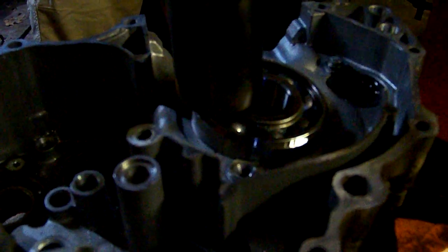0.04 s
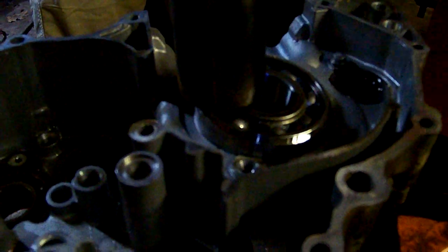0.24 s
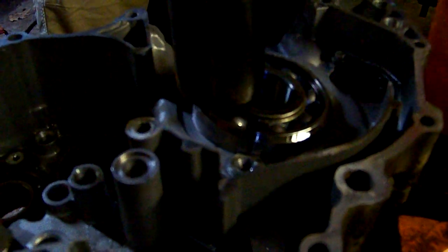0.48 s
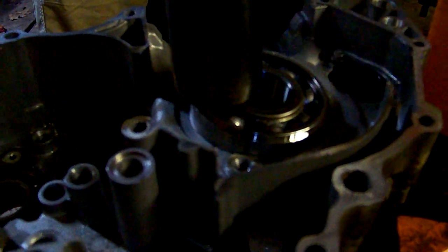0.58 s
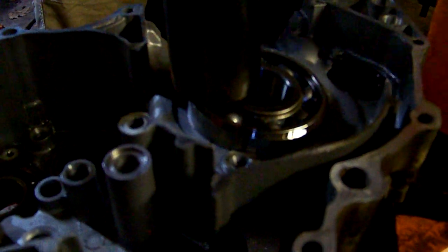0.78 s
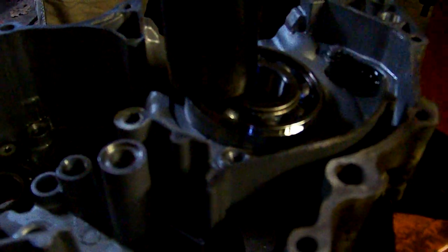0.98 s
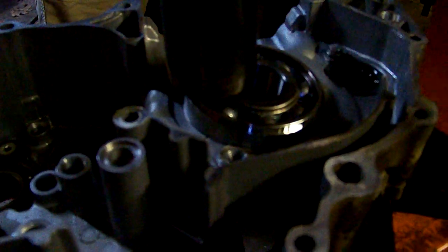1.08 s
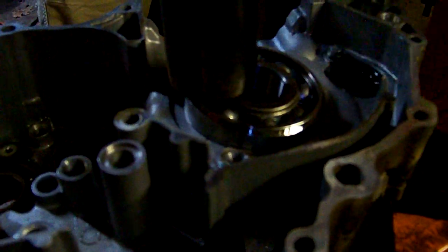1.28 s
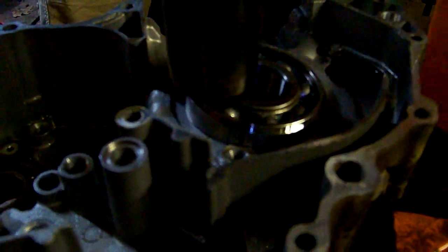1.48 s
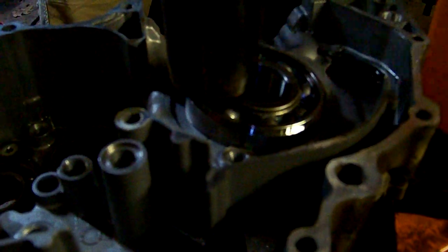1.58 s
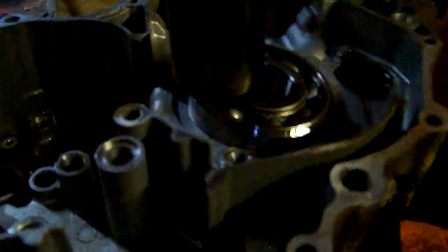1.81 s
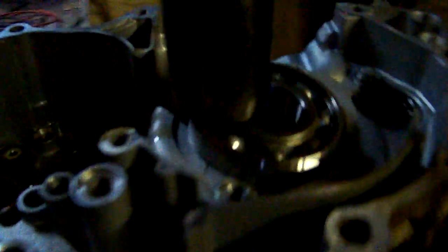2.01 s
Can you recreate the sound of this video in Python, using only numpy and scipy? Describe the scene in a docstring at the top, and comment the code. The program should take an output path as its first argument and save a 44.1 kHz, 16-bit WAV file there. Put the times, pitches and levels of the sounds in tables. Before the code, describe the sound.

A jack-driven press gives sharp, uneven steel clicks, then clunks at about 0.2 seconds, leaving an engine casing ringing and loose parts chattering lightly. The handle knocks near 0.75 seconds, followed by short pivot scrapes and a sharp click. More clicks lead to a second ringing clunk at 1.25 seconds. Another knock, scrape and fading clicks follow from 1.7 seconds. Faint hiss and low rumble fill the small workshop.

```python
"""A jack-driven shop press pushes a bearing into an engine casing in a small workshop.
Twice the steel linkage clicks and the loaded frame clunks, setting the casing ringing; between strokes
the handle knocks at the end of its travel, its pivot scrapes and loose parts chatter. Each impact is
a brief broadband contact followed by the free decay of the struck body's modes. The walls add
reverberation, and hiss, a low rumble and a drone lie underneath."""
import sys
import numpy as np
from scipy import signal
from scipy.fft import rfft, irfft
from scipy.io import wavfile
from scipy.ndimage import uniform_filter1d

SR = 44100
rng = np.random.default_rng(int(sys.argv[2]) if len(sys.argv) > 2 else 0)


def unload_wav(signal):
    """Save mono or channel-first audio to the path in sys.argv[1] as 16-bit WAV at rate SR, clipped to [-1, 1]."""
    wavfile.write(
        sys.argv[1],
        SR,
        np.round(np.clip(np.atleast_2d(signal).T, -1, 1) * 32767).astype(np.int16),
    )


N = 90404
T = np.arange(int(.8 * SR)) / SR  # time axis of one event, in seconds

# Envelopes of the two low tones. Each row: time in seconds, relative level in dB.
RUMBLE_LEVELS = [(0.0, -46.5), (0.19, -51), (0.22, -52), (0.32, -48.5), (0.36, -52), (0.5, -41.5),
                 (0.71, -56.5), (0.74, -44), (1.01, -53.5), (1.21, -43.5), (1.37, -50), (1.39, -59),
                 (1.66, -44), (1.76, -55), (1.78, -48), (2.05, -64)]
DRONE_LEVELS = [(0, -49.5), (.3, -49), (.65, -49), (.8, -41), (.95, -52), (1.15, -56.5), (1.3, -53),
                (1.45, -79), (1.63, -65), (1.72, -39.5), (1.88, -45), (2.05, -66)]
# Spectra of the hiss and the wall reflections. Each row: frequency in Hz, relative level in dB.
HISS_SPECTRUM = [(20, -2.5), (70, -2.5), (110, -3.5), (240, -6), (305, -15.5), (380, -11.5), (520, -2.5),
                 (640, -8), (850, -7), (1100, -11), (1500, -8.5), (2000, -16), (4000, -19.5), (7000, -22.5),
                 (8000, -40), (9500, -43.5)]
WALL_SPECTRUM = [(200, 1), (450, -1), (900, -1), (2000, 1), (3000, -6), (4200, 1), (6000, -2.5),
                 (9000, -7.5)]
# Reverberation of the workshop. Each row: frequency in Hz, time to decay by 60 dB (T60) in seconds.
ROOM_T60 = [(200, 0.49), (700, 0.21), (1700, 0.27), (3500, 0.19), (8000, 0.2)]
# Likeness of the noise in the two channels. Each row: frequency in Hz, correlation coefficient.
COHERENCE = [(100, 0.79), (800, 0.57), (2500, 0.25), (5000, 0.17), (9000, 0.13)]
# Response dips at the microphone's position. Each row: frequency in Hz, gain in dB.
POSITION_DIPS = [(270, -4), (305, -9), (345, -0.5), (915, -1), (965, -9.5), (1015, -0.5)]
# Imbalance of the microphone ports. Each row: frequency in Hz, left minus right in dB.
PORT_BALANCE = [(40, 10.5), (400, 11), (850, 10.5), (1450, 3.5), (2200, 4.5), (3100, 4.5), (4200, 0),
                (5600, 0), (6800, -2.5), (9000, -5)]

# Modes of the linkage. Each row: frequency in Hz, relative level in dB.
LINKAGE_MODES = [(1430, -5), (2140, -20), (2290, -5), (2790, -2), (2870, -13.5), (3040, 3), (3185, -2.5),
                 (3630, -1), (3720, -5.5), (3850, -0.5), (4900, -12.5), (5480, -15.5), (6520, -16.5)]
# Modes of the other bodies. Each row: frequency in Hz, relative level in dB, T60 in seconds.
HANDLE_MODES = [(413, 0, 0.1), (567, -5.5, 0.085), (746, 0, 0.026), (879, 2.5, 0.074), (940, 4, 0.074),
                (1040, -17, 0.13), (1504, -3.5, 0.12)]
FRAME_MODES = [(397.3, -11.5, 0.063), (690, -12.5, .05), (760, -2.5, 0.062), (878, 3.5, 0.064),
               (1016, -9, 0.11)]
CASING_MODES = [(527, -14.5, 1.3), (855, 1, .45), (867, -3.5, 0.1), (999, -3, 0.25), (1136, -0.5, .35),
                (1236, -5.5, .5), (1430, -29.5, .45), (1462, 3.5, 0.21), (1475, -4, 0.41),
                (1474, -2.5, 0.81), (1596, -3, 0.25), (1944, -25, .25), (2256, -21, .27), (2113, -3, .24),
                (2700, -12, 0.68)]
# Spectra of the dense, brief vibration at each contact. Each row: frequency in Hz, relative level in dB.
RATTLE_SPECTRUM = [(300, -33), (520, -10.5), (650, -8.5), (850, -1.5), (1200, -22), (1400, -3.5), (1530, 7),
                   (1700, -31.5), (2200, -14.5), (4000, -21), (9000, -47.5)]
KNOCK_SPECTRUM = [(100, -25.5), (300, -19.5), (380, -4.5), (700, -7.5), (930, 2), (1300, -10), (2500, -7.5),
                  (3200, -3), (3800, -16), (6500, -24), (9500, -48.5)]
SCRAPE_SPECTRUM = [(100, -21.5), (800, -1), (1100, -11), (1600, -1.5), (3000, 3.5), (4300, -6), (4900, -8),
                   (5700, -12), (6600, -5.5), (7300, -11), (7900, -19), (9400, -28)]
CLICK_SPECTRUM = [(100, -11.5), (500, -23.5), (1000, -14.5), (1900, -10), (3100, -4), (4400, -12),
                  (5500, -13), (7200, -28.5), (8000, -36.5), (9500, -45.5)]
CLACK_SPECTRUM = [(100, -31), (300, -18), (800, 5.5), (1000, 2.5), (1500, 12), (2150, 5), (2450, -16.5),
                  (3700, -1), (6000, -19), (9500, -49.5)]
THUMP_SPECTRUM = [(60, -7.5), (240, -15), (305, -25), (380, -2.5), (590, -16.5), (840, 20), (980, -17.5),
                  (1600, 0), (2600, -16), (8000, -46)]

# Loose parts chatter after each clunk. Each row: start in seconds, level in dB.
RATTLES = [(0.278, -47), (0.325, -38), (0.404, -42), (.447, -44), (0.482, -49), (.515, -52), (.621, -70.5),
           (1.296, -51.5), (1.336, -35.5), (1.405, -53), (1.464, -47.5), (1.49, -48), (1.52, -56)]
# The handle meets its stop. Each row: start in seconds, level in dB, tilt in dB per octave.
KNOCKS = [(0.7562, -29.5, 0), (0.765, -34.5, -1), (1.6885, -27, 1), (1.697, -30.5, -3), (1.859, -46.5, -13)]
# The pivot slips. Each row: start in seconds, length in seconds, level in dB, tilt in dB per octave.
SCRAPES = [(0.217, 0.018, -24, -4.5), (0.8157, 0.0074, -30, -0.5), (0.824, 0.0092, -27.5, 3),
           (.835, 0.0059, -26, 2), (0.8593, .011, -19.5, 3.5), (1.195, 0.04, -34, -4.5),
           (1.237, 0.024, -27.5, -4), (1.741, .004, -39.5, 1.5), (1.7477, 0.015, -23, 0.5),
           (1.972, 0.048, -42.5, 1.5)]
# The linkage snaps. Each row: start in seconds, level in dB, tilt in dB per octave,
# ping frequency in Hz, ping level relative to the snap in dB.
CLICKS = [(.0855, -49, 8.5, 4510, 0), (0.1466, -29.5, -1.5, 3074, -2), (0.1821, -38, 3, 2770, 1),
          (.197, -38, -5, 1480, -13.5), (.2108, -17.5, 2, 3210, -7.5), (.2275, -26, 1.5, 3770, -3),
          (.8718, -17, 2, 2850, -8), (.971, -46, 4.5, 1536, -3.5), (1.0205, -37, -4, 3150, -13),
          (1.0372, -25.5, 3, 3214, 1.5), (1.1695, -45, -1.5, 2300, -4), (1.1802, -34.5, -2.5, 2890, 3),
          (1.2097, -25.5, -2.5, 2710, -3), (1.231, -20.5, -0.5, 3124, -1), (1.239, -24.5, -4, 3260, -6.5),
          (1.7822, -33, -4.5, 3220, -15), (1.796, -25.5, -1, 2290, -20), (1.899, -45, 13.5, 6500, -13),
          (1.9378, -37.5, -1.5, 3050, -1), (1.9668, -41, 16, 3200, 5), (1.9735, -39, -6, 3170, -16)]
# The frame takes the load. Each row: start in seconds, clack level in dB, thump level in dB,
# delay from thump to rebound in seconds.
CLUNKS = [(0.2302, -17.5, -16, 0.0087), (1.2475, -17.5, -16.5, 0.00677)]


def amp(db):
    """Amplitude grows tenfold for every 20 dB."""
    return 10 ** (np.asarray(db) / 20)


def curve_at(points, hz):
    """Interpolation along a logarithmic frequency axis."""
    known_hz, values = np.transpose(points)
    return np.interp(np.log(hz + 1), np.log(known_hz + 1), values)


def add(mix, start, sound):
    """Superposition: a sound adds to the mix from its start in seconds."""
    part = mix[:, max(round(start * SR), 0):][:, :sound.shape[-1]]
    part += sound[..., :part.shape[1]]


def unit(x):
    """Energy normalisation: a hit gets the energy of 10 ms at full level."""
    return x / np.sqrt(np.mean(x ** 2) * x.shape[-1] / SR * 100 + 1e-20)


def noise(count):
    """Partial coherence: two channels of white noise are the sum and difference of mid and side."""
    mid, side = rfft(rng.standard_normal((2, count)))
    coherence = np.clip(curve_at(COHERENCE, np.fft.rfftfreq(count, 1 / SR)), -1, 1)
    mid, side = mid * np.sqrt((1 + coherence) / 2), side * np.sqrt((1 - coherence) / 2)
    return irfft([mid + side, mid - side], count)


def coloured(x, spectrum, tilt_db=0):
    """Minimum-phase filtering imposes a spectrum causally, with a tilt per octave above 500 Hz."""
    hz = abs(np.fft.fftfreq(4096, 1 / SR))
    octaves = np.log2(np.maximum(hz, 500) / 500)
    log_gain = np.log(amp(curve_at(spectrum, hz) + tilt_db * octaves))
    taps = np.fft.ifft(np.exp(np.conj(signal.hilbert(log_gain)))).real[:2048]
    return signal.fftconvolve(x, taps[None], axes=1)[:, :x.shape[1]]


def low_tone(levels, hz, wander, gain_db):
    """Slow random frequency modulation makes a low sinusoid waver."""
    t = np.arange(N) / SR
    drift = np.interp(t, np.linspace(0, t[-1], num=40), rng.standard_normal(40))
    phase = 2 * np.pi * np.cumsum(hz * (1 + wander * drift)) / SR
    return amp(np.interp(t, *np.transpose(levels)) + gain_db) * np.sin(phase)


def background(hiss_db=-49):
    """The noise floor: stationary hiss superposed on a low rumble and a drone."""
    hiss = coloured(noise(N), HISS_SPECTRUM)
    rumble = low_tone(RUMBLE_LEVELS, hz=40, wander=.08, gain_db=5.5)
    drone = low_tone(DRONE_LEVELS, hz=75.3, wander=0.098, gain_db=-3.5)
    return amp(hiss_db) * hiss / hiss.std() + rumble + drone


def room(x, wet_db, build_s=0.0069):
    """Reverberation: diffuse reflections build up after the direct sound; the bass lasts longest."""
    hz, t, bands = signal.stft(noise(len(T)), SR, nperseg=256)
    decay = amp(-60 * t / curve_at(ROOM_T60, hz)[:, None])
    tail = signal.istft(bands * decay, SR, nperseg=256)[1][:, :len(T)]
    build = 1 - np.exp(-(T / build_s) ** 2)
    spectrum = rfft(tail * build, 2 * len(T))
    power = abs(spectrum) ** 2
    # level out narrow peaks and troughs
    evenness = np.sqrt(uniform_filter1d(power, size=1500) / uniform_filter1d(power, size=60))
    tail = irfft(spectrum * evenness)[:, :len(T)] * np.sqrt(build)
    tail /= np.linalg.norm(tail, axis=1, keepdims=True)
    return x + amp(wet_db) * signal.fftconvolve(x, coloured(tail, WALL_SPECTRUM), axes=1)[:, :N]


def ring(modes, tilt_db=0):
    """Free vibration is a sum of damped modes; dividing by sqrt(T60) makes each level an energy share."""
    vibration = np.zeros(len(T))
    for k, (hz, db, t60) in enumerate(modes):
        envelope = amp(db + tilt_db * np.log2(hz) - 60 * T / t60) / np.sqrt(t60)
        vibration += (-1) ** k * envelope * np.sin(2 * np.pi * hz * T)
    return unit(vibration)


def linkage_ring(tilt_db=0, t60=0.035):
    """Equal damping: all modes of the steel linkage die together in a short clink."""
    return ring([(hz, db, t60) for hz, db in LINKAGE_MODES], tilt_db)


def contact(spectrum, hold_s, t60, tilt_db=0, snap=0):
    """Modal overlap: an impact's crowded modes act as decaying noise, led by an impulse of size snap."""
    out = np.zeros((2, len(T)))
    t = T[:len(T) // 4]
    envelope = amp(-60 * np.maximum(t - hold_s, 0) / t60)
    excitation = unit(noise(len(t)) * envelope) + snap * unit(1. * (t == 0))
    out[:, :len(t)] = unit(coloured(excitation, spectrum, tilt_db))
    return out


def casing_rattles(casing_db=-6):
    """Repeated excitation: light impacts of loose parts keep the casing ringing."""
    out, casing = np.zeros((2, N)), ring(CASING_MODES)
    for start, db in RATTLES:
        chatter = contact(RATTLE_SPECTRUM, hold_s=0.0072, t60=0.17)
        add(out, start, amp(db) * unit(chatter + amp(casing_db) * casing))
    return out


def handle_knocks(linkage_db=-8):
    """Sudden deceleration at the end of travel excites the modes of the handle and linkage."""
    out = np.zeros((2, N))
    for start, db, tilt in KNOCKS:
        body = ring(HANDLE_MODES) + amp(linkage_db + 2 * tilt) * linkage_ring()
        knock = contact(KNOCK_SPECTRUM, hold_s=0.0035, t60=0.075, tilt_db=tilt, snap=0.17)
        add(out, start, amp(db) * unit(knock + body))
    return out


def pivot_scrapes(slips_per_s=800, grit=0.255, linkage_db=-4):
    """Stick-slip friction: a run of tiny random slips rasps and drives the linkage's modes."""
    out = np.zeros((2, N))
    for start, length, db, tilt in SCRAPES:
        slips = (rng.random(len(T)) < slips_per_s / SR) * rng.standard_normal(len(T))
        force = (T < length) * (slips + grit * noise(len(T))) + (T == 0)
        rasp = unit(coloured(force, SCRAPE_SPECTRUM, tilt))
        tone = unit(signal.fftconvolve(force, linkage_ring(tilt)[None], axes=1)[:, :len(T)])
        add(out, start, amp(db) * unit(rasp + amp(linkage_db) * tone))
    return out


def linkage_clicks(linkage_db=-1, casing_db=-17, ping_t60=.027):
    """Brief steel contacts excite high modes: a ping, the linkage and faintly the casing, in the room."""
    snaps, pings, casing = np.zeros((2, N)), np.zeros((2, N)), ring(CASING_MODES)
    for start, db, tilt, ping_hz, ping_db in CLICKS:
        crack = contact(CLICK_SPECTRUM, hold_s=0.0014, t60=0.054, tilt_db=tilt, snap=.6)
        body = amp(linkage_db) * linkage_ring(tilt) + amp(casing_db) * casing
        gain = amp(db) / np.hypot(1, amp(ping_db))  # snap and ping share the energy
        add(snaps, start, gain * unit(crack + body))
        add(pings, start, gain * amp(ping_db) * ring([(ping_hz, 0, ping_t60)]))
    return room(snaps, wet_db=-8) + room(pings, wet_db=-3)


def frame_clunks(frame_db=-1, casing_db=-5, rebound_db=-7, thump_lag_s=.0045):
    """Impulsive loading: a clack rings the lightly damped casing, then the frame thumps and rebounds."""
    out = np.zeros((2, N))
    casing, frame = amp(casing_db) * ring(CASING_MODES), amp(frame_db) * ring(FRAME_MODES)
    for start, clack_db, thump_db, rebound_s in CLUNKS:
        clack = contact(CLACK_SPECTRUM, hold_s=0.00072, t60=0.032, snap=0.89) + casing
        thump = contact(THUMP_SPECTRUM, hold_s=0.00036, t60=0.035, snap=0.58) + frame
        rebound = contact(THUMP_SPECTRUM, hold_s=0.0037, t60=0.041)
        add(out, start, amp(clack_db) * unit(clack))
        add(out, start + thump_lag_s, amp(thump_db) * unit(thump))
        add(out, start + thump_lag_s + rebound_s, amp(thump_db + rebound_db) * rebound)
    return out


def scene():
    """Sound pressures add; each part of the press has its own ratio of reflected to direct sound."""
    clicks = linkage_clicks()
    scrapes = room(pivot_scrapes(), wet_db=-6.5)
    clunks = room(frame_clunks(), wet_db=-10)
    knocks_and_rattles = room(handle_knocks() + casing_rattles(), wet_db=-7)
    return clicks + scrapes + clunks + knocks_and_rattles + background()


def record(dry):
    """Linear filtering: dips at the microphone, two ports unequal in level and delay, a band limit."""
    left_lag_s, cutoff_hz = .000055, 9900
    hz = np.fft.rfftfreq(2 * N, 1 / SR)
    lean_db = curve_at(PORT_BALANCE, hz) / 2
    ports = np.array([amp(lean_db) * np.exp(-2j * np.pi * hz * left_lag_s), amp(-lean_db)])
    stereo = irfft(rfft(coloured(dry, POSITION_DIPS), 2 * N) * ports)[:, :N]
    lowpass = signal.firwin(101, cutoff_hz, window=("kaiser", 6), fs=SR)
    return signal.oaconvolve(stereo, lowpass[None], "same")


dry = scene()
out = record(dry)
unload_wav(out)
```